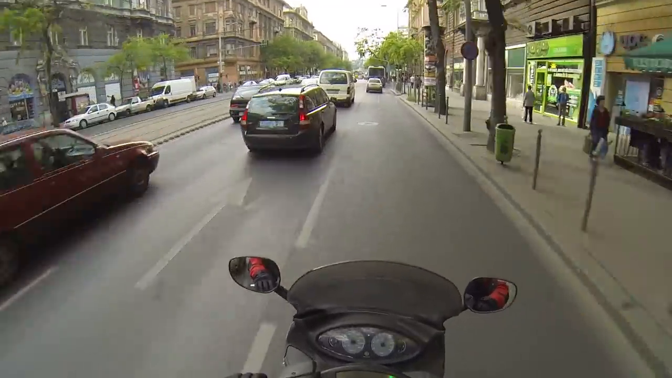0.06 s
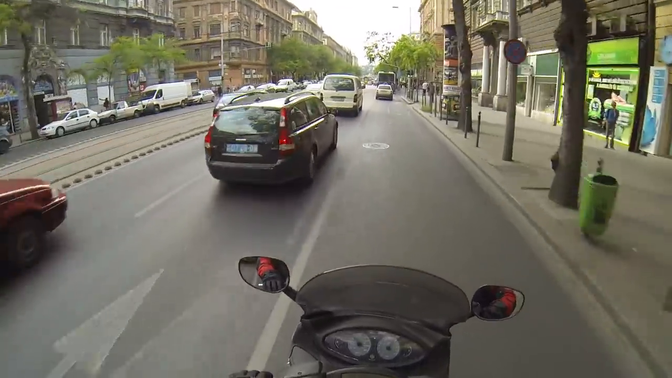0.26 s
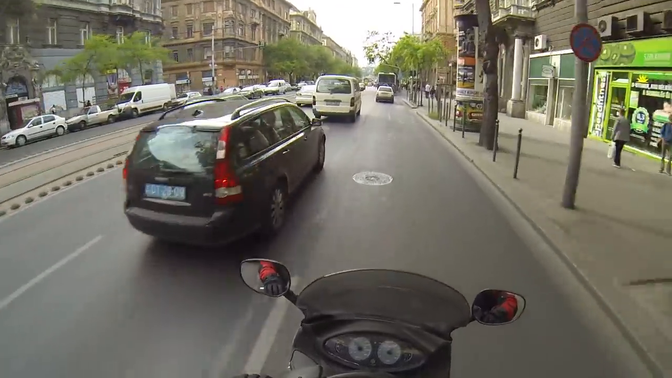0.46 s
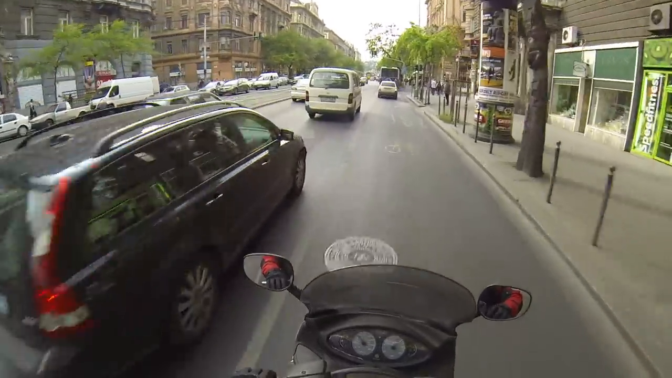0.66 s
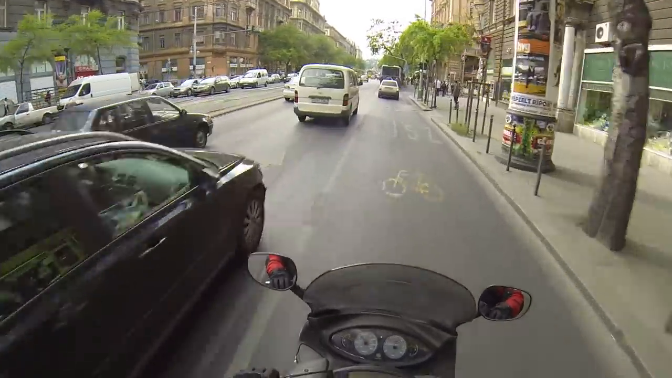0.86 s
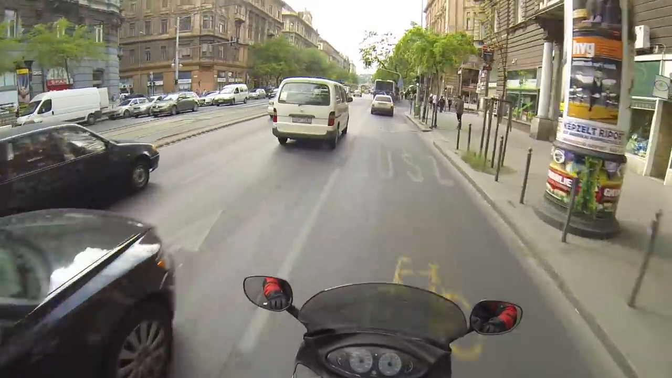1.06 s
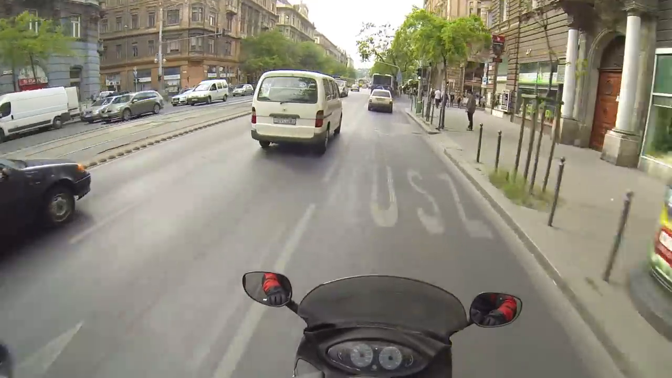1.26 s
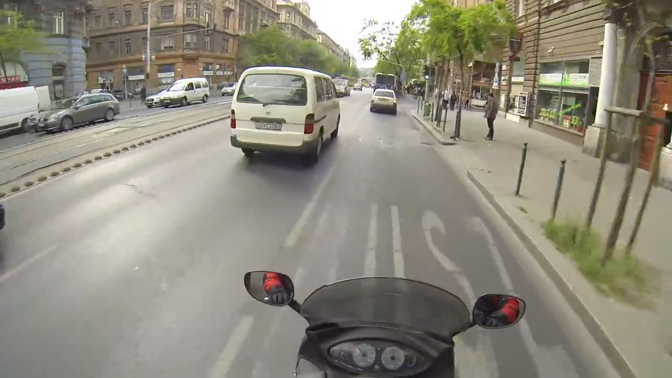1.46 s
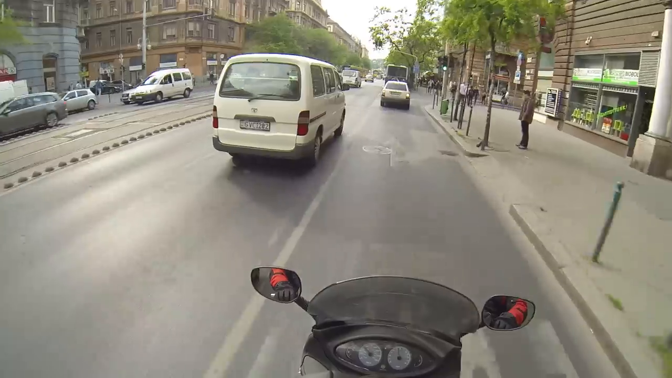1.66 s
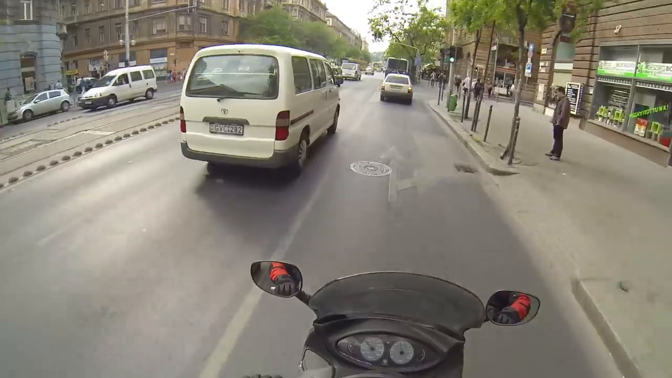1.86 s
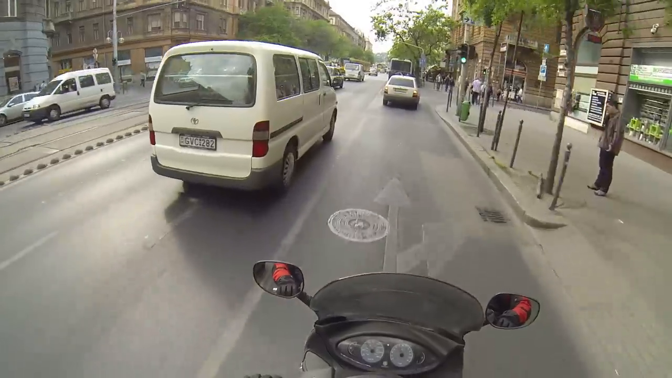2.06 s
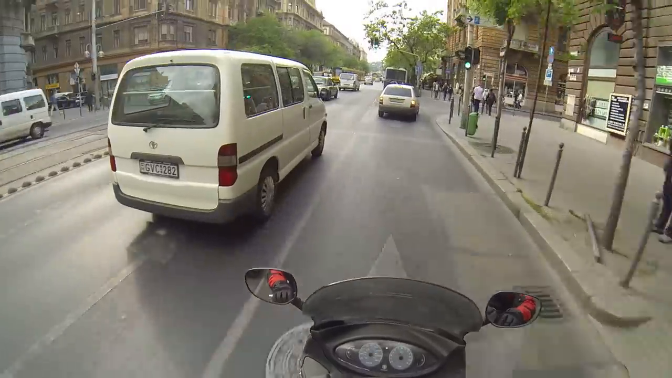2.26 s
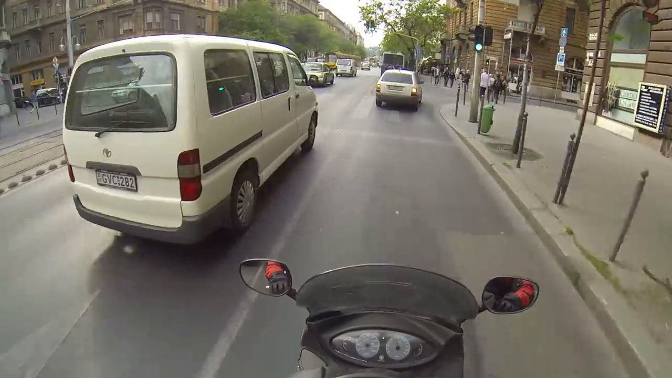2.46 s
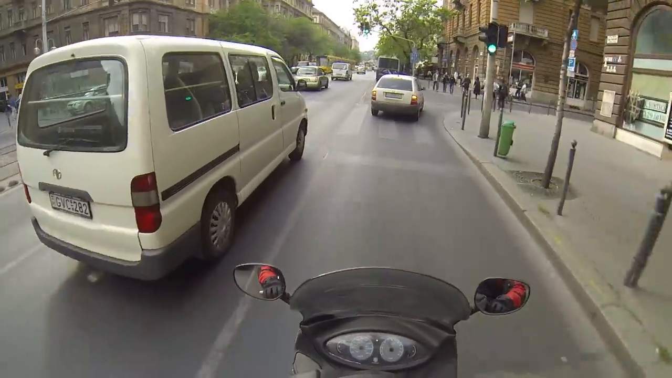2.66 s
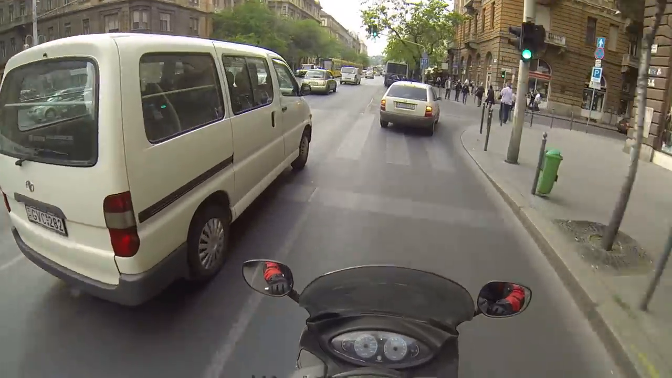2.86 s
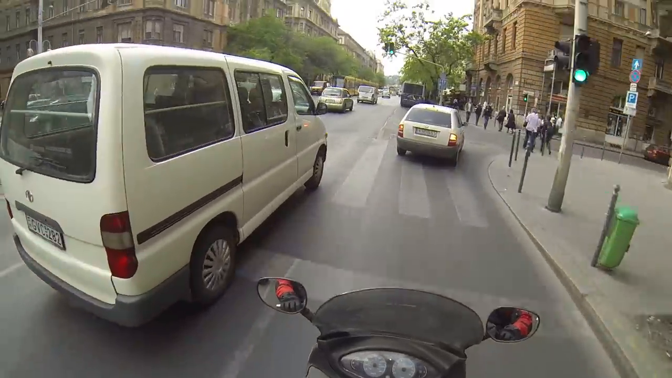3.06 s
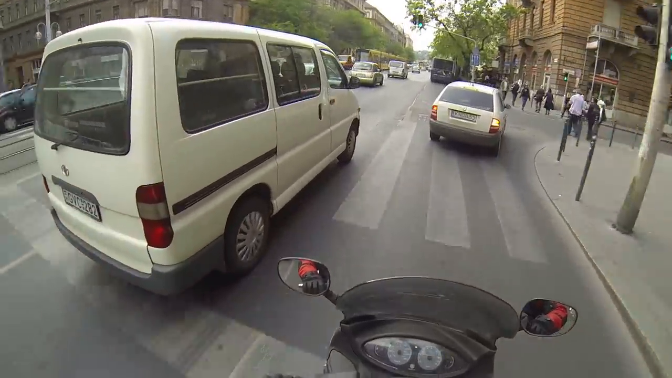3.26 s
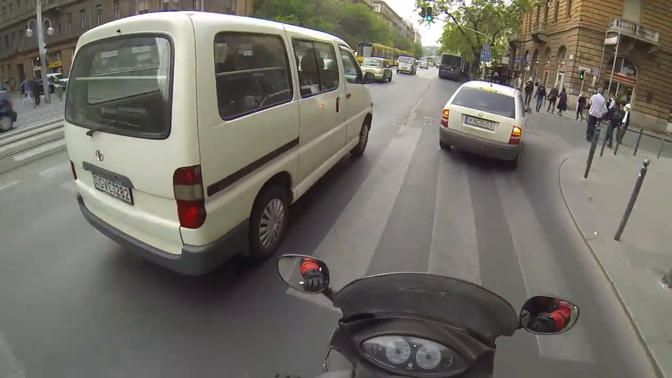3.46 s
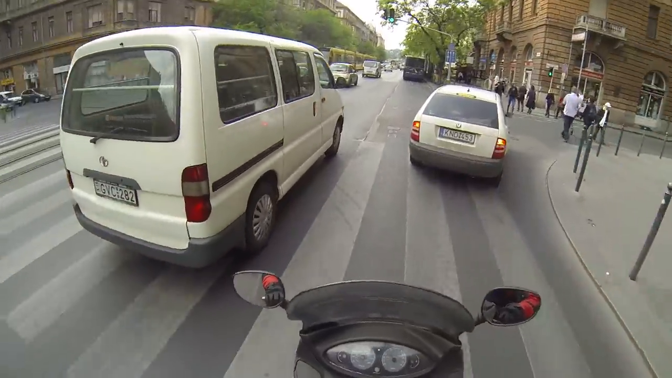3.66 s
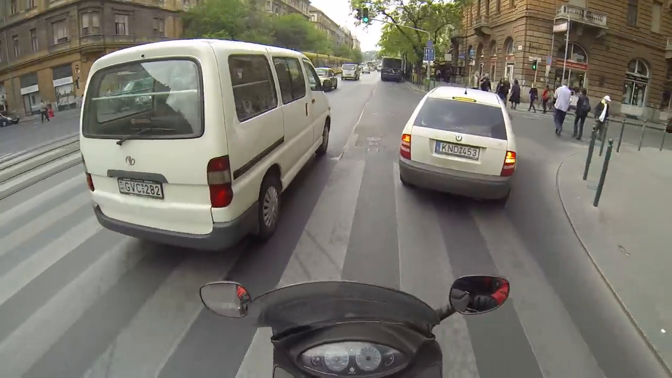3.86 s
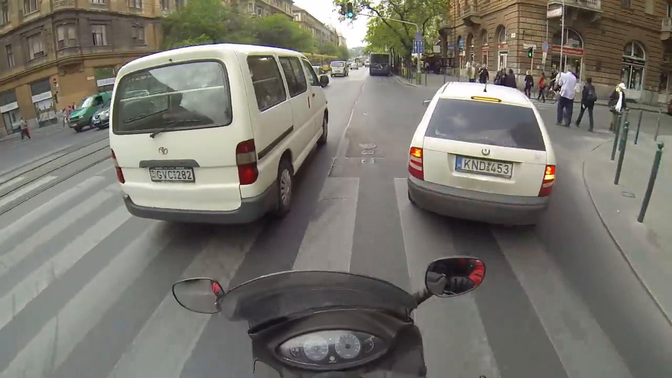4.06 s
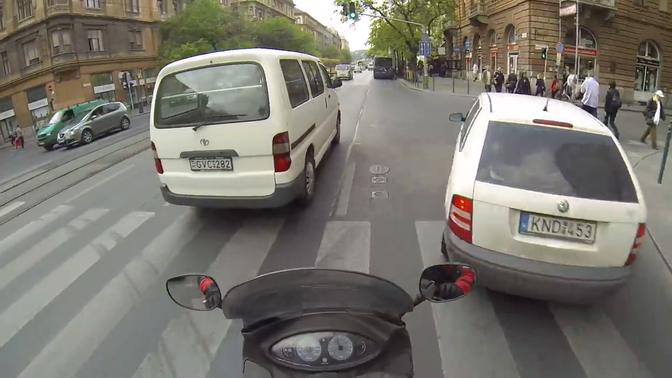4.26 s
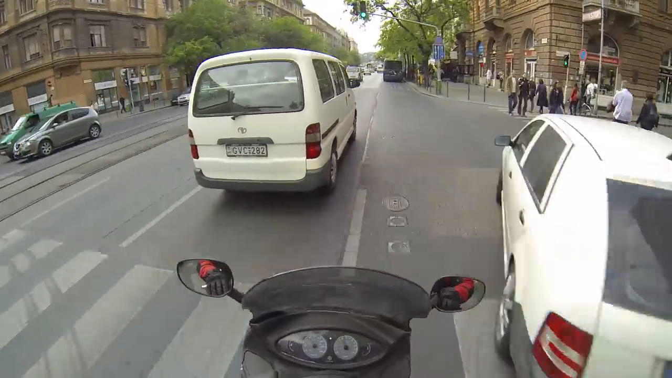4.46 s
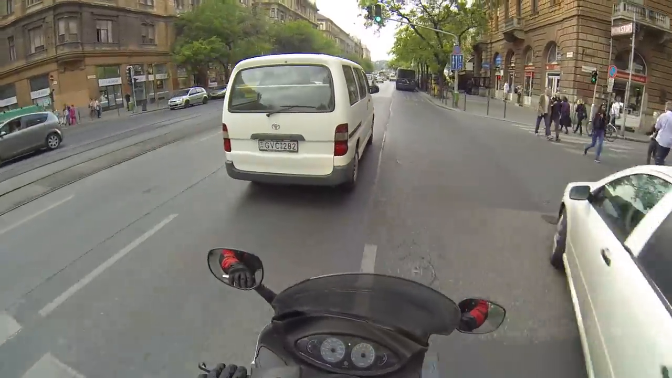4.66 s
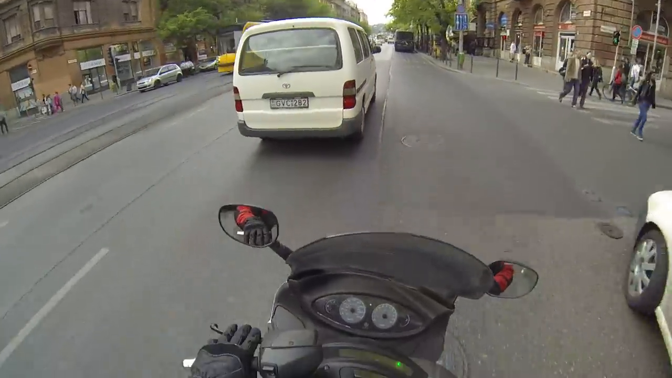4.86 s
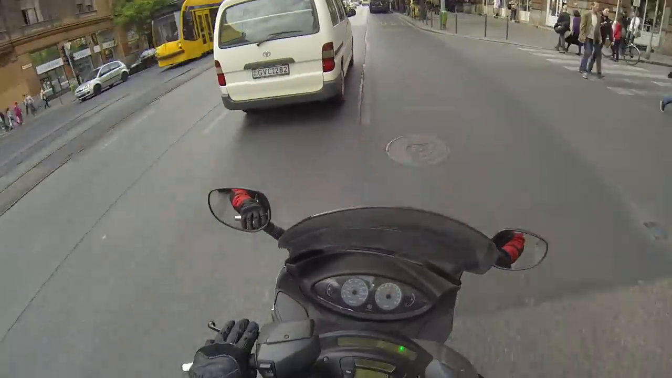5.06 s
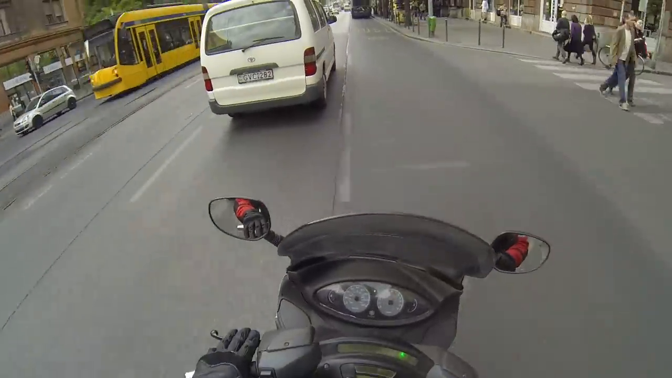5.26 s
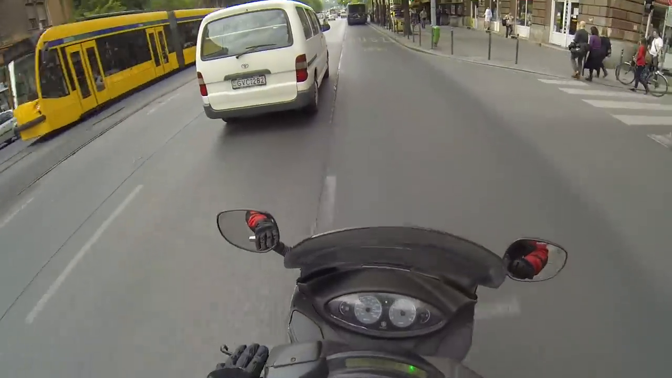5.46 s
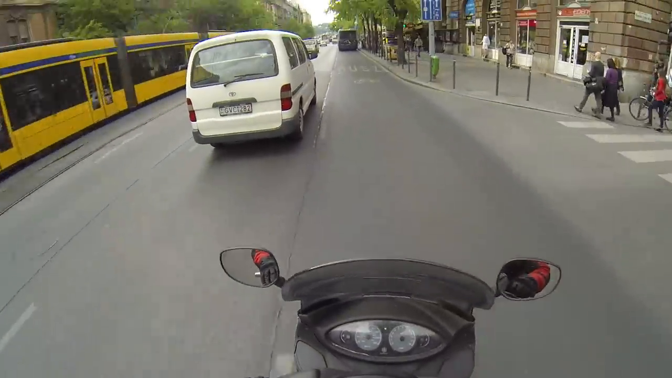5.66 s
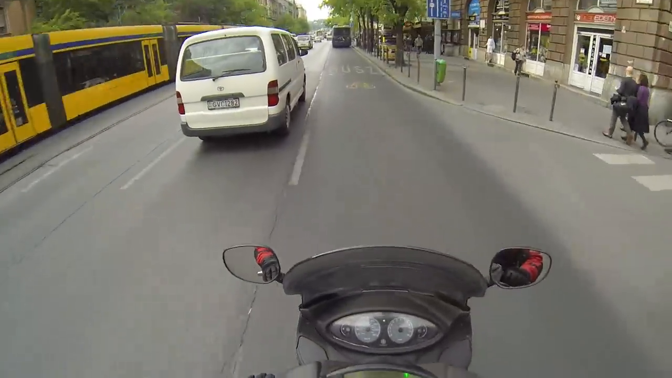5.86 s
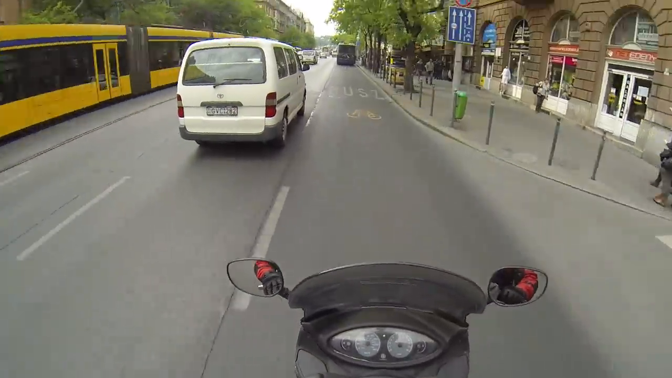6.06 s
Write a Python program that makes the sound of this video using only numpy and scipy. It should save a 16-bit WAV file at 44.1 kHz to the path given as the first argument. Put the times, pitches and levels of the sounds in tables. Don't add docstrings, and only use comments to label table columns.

```python
import sys
import numpy as np
from scipy import signal
from scipy.fft import rfft, irfft, next_fast_len
from scipy.io import wavfile
from scipy.ndimage import uniform_filter1d, map_coordinates

SR = 44100
rng = np.random.default_rng(int(sys.argv[2]) if len(sys.argv) > 2 else 0)


def wav_record(signal):
    frames = np.transpose(np.atleast_2d(signal))
    bounded = np.clip(frames, -1, 1)
    quanta = np.round(bounded * 32767).astype(np.int16)
    wavfile.write(sys.argv[1], SR, quanta)


def ratio_of_db(decibels):
    return 10 ** (np.asarray(decibels, float) / 20)


N = 269451
T = np.arange(N) / SR

# centre_s [s], pitch_hz [Hz], peak_db [dB], half_length_s [s]
SWAY_JOLTS = [(0.104, 37.66, -10.7, 0.082), (0.293, 38.76, -7, 0.067), (0.465, 40.4, -11.5, 0.087),
              (0.67, 39.4, -10, 0.041), (0.913, 38.68, -19.5, 0.15), (1.07, 41.76, -10.5, 0.045),
              (1.194, 40.84, -16.5, 0.082), (1.381, 38.4, -10.5, 0.045), (1.544, 34.9, -17.5, 0.032),
              (1.716, 37.6, -12.5, 0.15), (1.937, 37.1, -14, 0.057), (2.106, 38.6, -16.5, 0.073),
              (2.368, 36.67, -18, 0.13), (2.669, 37.24, -22.5, 0.13), (2.912, 38.82, -16.5, 0.11),
              (3.271, 37.83, -20.5, 0.14), (3.575, 33.77, -30, 0.046), (3.76, 38.2, -25.5, 0.065),
              (4.021, 34.4, -31, 0.21), (4.273, 33.76, -30, 0.12), (4.567, 39.1, -18, 0.089),
              (4.761, 38.35, -17, 0.029), (4.899, 37.85, -10.5, 0.1), (5.246, 37.47, -21, 0.2),
              (5.495, 36.4, -24.5, 0.043), (5.675, 39.77, -23, 0.048), (5.823, 39.14, -20.5, 0.039),
              (6.01, 40.87, -19.5, 0.077)]
# centre_s [s], pitch_hz [Hz], peak_db [dB], half_length_s [s]
NOD_JOLTS = [(0.166, 53.9, -7.5, 0.049), (0.346, 55, -33, 0.051), (0.536, 50.7, -19, 0.029),
             (0.687, 54.1, -21, 0.13), (0.916, 53.7, -19.5, 0.051), (1.017, 51.3, -22, 0.017),
             (1.129, 51.5, -19, 0.072), (1.452, 54.8, -25.5, 0.21), (1.807, 53.3, -18, 0.07),
             (1.981, 51.4, -18, 0.033), (2.105, 54.16, -23, 0.032), (2.426, 54.53, -27.5, 0.19),
             (2.755, 52.6, -21.5, 0.076), (2.876, 51.8, -18.5, 0.03), (3.007, 55.9, -23.5, 0.071),
             (3.172, 53.7, -33, 0.044), (3.312, 54.35, -36, 0.06), (3.481, 53.2, -36, 0.042),
             (3.748, 50.8, -35, 0.14), (3.888, 51.1, -36, 0.036), (4.053, 54.24, -31.5, 0.11),
             (4.568, 54.73, -24.5, 0.18), (4.95, 54.9, -21, 0.11), (5.253, 55.2, -28, 0.2),
             (5.492, 55.1, -27, 0.055), (5.702, 53.35, -26.5, 0.08), (5.83, 56.13, -19, 0.072),
             (5.997, 52.9, -25.5, 0.11)]
# freq_hz [Hz], density_db [dB per Hz]
BUFFETING = [(5, -32.5), (12, 15), (25, 13), (60, 9.5), (72, -6), (85, -6), (120, -69)]
# start_s [s], level_db [dB]
WIND_FLOW = [(0, -27.5), (.4, -30.5), (.72, -31), (.92, -25.5), (1.15, -29.5), (1.4, -29.5), (1.6, -30),
             (1.8, -34.5), (2.35, -40.5), (2.7, -42), (3.2, -41.5), (3.65, -49), (4.1, -45.5), (4.42, -43),
             (4.65, -35.5), (4.85, -37), (5.3, -37), (6.11, -37.5)]
# centre_s [s], rise_db [dB], half_length_s [s]
FLOW_SWELLS = [
    (.6, -1.5, 0.035),
    (1.04, 5, 0.034),
    (1.12, -3, 0.03),
    (1.42, -4, 0.052),
    (1.3, 1, 0.043),
    (2.85, 8.5, 0.077),
    (3.3, 3, 0.047),
    (4.25, 6, 0.054),
    (5.55, 3, 0.12),
    (6.0, 1.5, 0.088),
]
# centre_s [s], rise_db [dB], half_length_s [s]
PORT_PUFFS = [(0.196, 10, 0.01), (0.474, 5, 0.015), (0.588, 8.5, 0.01), (0.63, 5.5, 0.031),
              (0.748, 10, 0.0059), (0.856, 4.5, 0.028), (1.527, 4.5, 0.013), (1.789, 4.5, 0.0087),
              (1.867, 5, 0.016), (2.848, -3, 0.033), (3.161, 3.5, 0.021)]
# freq_hz [Hz], width_hz [Hz], level_db [dB]
PORT_MODES = [(1269, 101, 4.5), (970, 980, -16)]
# freq_hz [Hz], width_hz [Hz], level_db [dB]
CHAMBER_MODES = [(1469, 387, -1), (1712, 204, -7.5)]
# start_s [s], hiss_db [dB]
TYRES = [(0, -39), (.3, -39), (.55, -41.5), (.85, -38), (1.08, -36.5), (1.58, -38.5), (1.75, -43.5),
         (2.0, -46.5), (2.4, -49), (2.68, -50), (2.82, -46), (3.0, -48.5), (3.5, -52), (4.42, -51.5),
         (4.58, -47), (5.0, -46.5), (5.5, -47), (6.11, -46.5)]
# freq_hz [Hz], density_db [dB per Hz]
TYRE_HISS = [(1060, -31), (1800, -5.5), (2210, -6), (2640, -3), (3130, -8), (3750, -8), (4400, -24.5),
             (5720, -64.5), (9680, -120)]
# freq_hz [Hz], density_db [dB per Hz]
TYRE_FIZZ = [(3500, -44.5), (4400, -6), (4980, -1), (6050, -8.5), (6470, -8.5), (6980, -12), (7540, -10.5),
             (8370, -18), (13500, -35), (14200, -32.5), (15200, -41.5)]
# freq_hz [Hz], density_db [dB per Hz]
FRAME_RUMBLE = [(50, -41.5), (80, -5.5), (105, 3.5), (135, -8), (300, -12.5), (600, -16.5), (850, -20),
                (1500, -53.5)]
# freq_hz [Hz], width_hz [Hz], level_db [dB]
PANEL_MODES = [(175, 30, 0), (403, 28, -3), (737, 50, -4)]
# freq_hz [Hz], density_db [dB per Hz]
PREAMP_NOISE = [(5000, -30.5), (8500, -2.5), (9600, -4), (11000, 3.5), (13300, -10.5), (14500, -10.5),
                (15200, -7)]
# centre_s [s], pitch_hz [Hz], peak_db [dB], half_length_s [s]
DISC_FITS = [(1.55, 14300, -86, .12), (1.85, 14480, -77, 0.023), (2.0, 14250, -79, 0.066),
             (2.27, 14400, -76, 0.041), (2.38, 14300, -75, .06), (2.52, 14550, -86, 0.055),
             (2.8, 14480, -83, 0.051), (2.92, 14620, -84, .05), (3.04, 14600, -79, 0.064),
             (3.17, 14560, -81, .06), (3.3, 14420, -79, 0.039), (3.42, 14330, -69, 0.047),
             (3.5, 14400, -90, 0.024), (3.6, 14450, -77, 0.045), (3.76, 14410, -71, 0.063),
             (3.86, 14500, -82, 0.063)]
# centre_s [s], pitch_hz [Hz], length_s [s], level_db [dB]
REAR_CHIRPS = [
    (1.8, 13500, .04, -84),
    (3.0, 12850, .05, -77),
    (3.09, 13380, .08, -79),
    (3.29, 13350, .12, -76),
]
# freq_hz [Hz], width_hz [Hz], level_db [dB]
CALIPER_MODES = [(5130, 40, 0), (5290, 40, 0), (5470, 35, -3), (7600, 1200, -13), (9550, 200, -13)]
# start_s [s], buzz_db [dB]
BRAKE_BUZZ = [
    (1.85, -74),
    (2.1, -68),
    (2.4, -71),
    (2.9, -68),
    (3.2, -68),
    (3.45, -67.5),
    (3.55, -85),
]
# start_s [s], pitch_hz [Hz], level_db [dB]
CAR_SQUEAK = [
    (3.785, 6660, -72),
    (3.81, 6580, -60),
    (3.84, 6540, -60),
    (3.875, 6530, -54),
    (3.89, 6540, -58),
    (3.905, 6560, -53),
    (3.93, 6600, -57),
]
# freq_hz [Hz], t60_s [s]
STREET_DECAY = [(200, 0.43), (6500, 0.47), (15000, 0.18)]
# start_s [s], rate_hz [cycles per s]
ENGINE_SPEED = [
    (4.3, 39.6),
    (4.436, 41.1),
    (4.53, 40.1),
    (4.994, 47.9),
    (5.454, 52.5),
    (5.938, 50.6),
    (6.11, 48.3),
]
# order [multiple of the cycle rate], level_db [dB]
EXHAUST_ORDERS = [(1, -6), (2, 0), (3, -7), (4, -15), (5, -8), (6, -8), (7, -12), (8, -12), (9, -18),
                  (10, -18), (11, -21), (12, -23)]
# start_s [s], level_db [dB]
THROTTLE_LEVEL = [
    (4.3, -52),
    (4.6, -49.5),
    (4.9, -42.5),
    (5.3, -40),
    (5.7, -43),
    (6.11, -40),
]
# freq_hz [Hz], width_hz [Hz], level_db [dB]
FLANGE_MODES = [(6280, 250, 0), (7300, 450, -3), (8400, 200, -10), (9500, 250, -9), (10250, 500, -7),
                (12700, 500, -17)]
# start_s [s], level_db [dB]
TRAM_LEVEL = [
    (0, -110),
    (4.72, -110),
    (4.82, -67.5),
    (5.26, -66),
    (5.34, -110),
    (6.2, -110),
]
# freq_hz [Hz], empty_share [0 to 1]
TREBLE_GAPS = [(11500, 0), (12500, .06), (13500, .22), (14300, .45), (14700, .75), (15000, .97), (15200, 1)]

USUAL_WIND_DB, USUAL_TYRE_DB = -36, -46


def unit(x):
    return x / np.sqrt(np.mean(x ** 2) + 1e-20)


def along(points, hz):
    f, v = np.transpose(points)
    return np.interp(np.log(hz + 1), np.log(f + 1), v)


def curves(rows):
    s, *cols = np.transpose(rows)
    return [np.interp(T, s, c) for c in cols]


def span(rows, fade):
    nearest_end = np.minimum(T - rows[0][0], rows[-1][0] - T)
    return np.clip(nearest_end / fade + 1, 0, 1)


def bumps(rows):
    return sum(db * np.exp(-((T - s) / half) ** 2) for s, db, half in rows)


def bursts(rows):
    s, hz, db, half = np.transpose(rows)[:, :, None]
    coarse = T[::32]
    gain = (ratio_of_db(db) * np.exp(-((coarse - s) / half) ** 2)).sum(0)
    return np.interp(T, s[:, 0], hz[:, 0]), np.interp(T, coarse, gain)


def wobble(rate):
    coarse = T[::32]
    knots = rng.standard_normal(int(N * rate / SR) + 4)
    return np.interp(T, coarse, map_coordinates(knots, [coarse * rate]))


def tone(hz, wander_hz, rate):
    cycles = np.cumsum(hz + wander_hz * wobble(rate)) / SR
    return np.sqrt(2) * np.sin(2 * np.pi * cycles)


def modes(rows):
    def response(f):
        total = 0
        for k, (centre, width, db) in enumerate(rows):
            damping = 1j * f * width
            total = total + (-1) ** k * ratio_of_db(db) * damping / (centre * centre - f * f + damping)
        return total
    return response


def power_modes(rows):
    response = modes(rows)
    return lambda f: np.abs(response(f)) ** 2


def shape(points):
    return lambda f: ratio_of_db(along(points, f))


def rush(response, patchy_db):
    z = signal.stft(rng.standard_normal(N + 512), nperseg=512)[2]
    field = uniform_filter1d(rng.standard_normal(z.shape), size=6, axis=0)
    field = uniform_filter1d(field, size=10, axis=1)
    x = signal.istft(z * ratio_of_db(patchy_db * unit(field)), nperseg=512)[1]
    m = next_fast_len(N + 8192)
    spectrum = rfft(x, m) * response(np.fft.rfftfreq(m, 1 / SR))
    return unit(irfft(spectrum, m)[:N])


def mount():
    (sway_hz, sway_gain), (nod_hz, nod_gain) = bursts(SWAY_JOLTS), bursts(NOD_JOLTS)
    rest = ratio_of_db(-48)
    sway = (sway_gain + rest) * ratio_of_db(1.5 * wobble(23)) * tone(sway_hz, wander_hz=1.6, rate=11)
    nod = (nod_gain + rest) * ratio_of_db(2.5 * wobble(14)) * tone(nod_hz, wander_hz=1.6, rate=14)
    shaking = uniform_filter1d(np.abs(sway) + np.abs(nod), size=SR // 4)
    return sway + nod + ratio_of_db(-9) * shaking * rush(shape(BUFFETING), patchy_db=2.6)


def flow():
    return curves(WIND_FLOW)[0] + bumps(FLOW_SWELLS)


def housing_walls(f):
    return 1 / (1 + (f / 2300) ** 4) / (1 + (900 / (f + 1)) ** 4)


def wind(firing):
    wind_db, tyre_db, puff_db = flow(), curves(TYRES)[0], bumps(PORT_PUFFS)
    tyre_swing = tyre_db - USUAL_TYRE_DB
    roar_db = -38 + 0.25 * (wind_db - USUAL_WIND_DB) + 0.5 * tyre_swing
    fizz_db = -58.5 + 1.2 * tyre_swing + 0.49 * puff_db + 1.0 * firing + 0.37 * wobble(30)
    hiss_db = tyre_db + 0.3 * puff_db + 0.8 * firing
    eddy_db = 0.2 * wobble(7) + 0.56 * wobble(16) + 0.37 * wobble(45)
    port, chamber = modes(PORT_MODES), modes(CHAMBER_MODES)
    whistle = ratio_of_db(wind_db + puff_db) * rush(lambda f: port(f) * housing_walls(f), patchy_db=1.16)
    roar = ratio_of_db(roar_db + 0.5 * puff_db) * rush(lambda f: chamber(f) * housing_walls(f), patchy_db=0.87)
    hiss = ratio_of_db(hiss_db) * rush(shape(TYRE_HISS), patchy_db=0.45)
    fizz = ratio_of_db(fizz_db) * rush(shape(TYRE_FIZZ), patchy_db=1.1)
    return ratio_of_db(eddy_db) * (whistle + roar + hiss + fizz)


def road():
    gust_db = uniform_filter1d(flow(), size=SR // 10)
    drum = ratio_of_db(gust_db - 12.5) * rush(power_modes(PANEL_MODES), patchy_db=1.0)
    tyre_swing = uniform_filter1d(curves(TYRES)[0], size=SR // 5) - USUAL_TYRE_DB
    pull_db = 1.5 * span(ENGINE_SPEED, fade=0.56)
    rumble_db = -40.5 + 0.71 * tyre_swing + pull_db + 0.18 * wobble(16)
    return ratio_of_db(rumble_db) * rush(shape(FRAME_RUMBLE), patchy_db=1.1) + drum


def electronics():
    frame_rate = 29.97
    readout = np.cos(np.pi * (frame_rate * T - 0.92)) ** 4
    whine = ratio_of_db(-84) * readout * tone(11300, wander_hz=8, rate=40)
    hiss_db = -81 + 3.3 * span(BRAKE_BUZZ, fade=0.493)
    return ratio_of_db(hiss_db) * rush(shape(PREAMP_NOISE), patchy_db=3.5) + whine


def brakes():
    hz, gain = bursts(DISC_FITS)
    halo = rush(power_modes([(14450, 350, 0)]), patchy_db=4.0)
    sing = ratio_of_db(3.0 * wobble(50)) * tone(hz, wander_hz=40, rate=90)
    out = ratio_of_db(-1) * gain * sing + ratio_of_db(-1.0) * uniform_filter1d(gain, size=SR // 4) * halo
    for s, pad_hz, length, pad_db in REAR_CHIRPS:
        envelope = np.exp(-((T - s) / length * 2) ** 4)
        out = out + ratio_of_db(pad_db + 3.0 * wobble(50)) * envelope * tone(pad_hz, wander_hz=50, rate=150)
    return out


def caliper():
    fits = rush(power_modes(CALIPER_MODES), patchy_db=2.5)
    buzz_db = curves(BRAKE_BUZZ)[0] + 2.2 * wobble(25)
    return span(BRAKE_BUZZ, fade=0.05) * ratio_of_db(buzz_db) * fits


def squeak():
    hz, db = curves(CAR_SQUEAK)
    pads = tone(hz, wander_hz=22, rate=90)
    pads = pads + ratio_of_db(-11) * tone(hz - 130, wander_hz=30, rate=90)
    direct = span(CAR_SQUEAK, fade=0.012) * ratio_of_db(db - 1) * pads
    f, t, z = signal.stft(rng.standard_normal(SR // 2), SR, nperseg=256)
    decay = ratio_of_db(-60 * t / along(STREET_DECAY, f)[:, None])
    tail = signal.istft(z * decay, SR, nperseg=256)[1]
    delayed = np.roll(direct, 600)
    echo = signal.fftconvolve(delayed, tail / np.linalg.norm(tail))[:N]
    return ratio_of_db(-1.5) * direct + ratio_of_db(-5.5) * echo


def engine():
    rate = uniform_filter1d(curves(ENGINE_SPEED)[0], size=SR // 5)
    turn = 2 * np.pi * np.cumsum(rate + 0.15 * wobble(20)) / SR
    on = span(ENGINE_SPEED, fade=0.32)
    orders = 0
    for k, level in EXHAUST_ORDERS:
        phase = rng.uniform(0, 2 * np.pi)
        orders = orders + ratio_of_db(level + 2.0 * wobble(6)) * np.sin(k * turn + phase)
    return on * ratio_of_db(curves(THROTTLE_LEVEL)[0] + 3.5) * orders, on * np.sin(turn)


def tram():
    return ratio_of_db(curves(TRAM_LEVEL)[0]) * rush(power_modes(FLANGE_MODES), patchy_db=1.5)


def thin_treble(x):
    padded = np.pad(x, [(0, 0), (0, 1024)], "reflect")
    hz, _, z = signal.stft(padded, SR, nperseg=1024, boundary="even")
    luck = rng.random((len(hz) // 6 + 1, z.shape[-1] // 2 + 1))
    luck = np.repeat(np.repeat(luck, 6, axis=0), 2, axis=1)[:len(hz), :z.shape[-1]]
    level = uniform_filter1d(np.abs(z) ** 2, size=5, axis=-2)
    strong = level > 4 * uniform_filter1d(level, size=60, axis=-2)
    keep = (luck > along(TREBLE_GAPS, hz)[:, None]) | strong
    return signal.istft(z * keep, SR, nperseg=1024)[1][..., :N]


def scene():
    exhaust, firing = engine()
    scooter = mount() + wind(firing) + road() + brakes() + caliper() + exhaust
    return (scooter + electronics() + squeak() + tram())[None]


def top_cut(x):
    return signal.sosfilt(signal.butter(12, 15360, fs=SR, output="sos"), x)


def record(dry):
    headroom = 1.6
    mix = thin_treble(np.tanh(dry / headroom) * headroom)
    return top_cut(mix)


dry = scene()
out = record(dry)
wav_record(out)
```